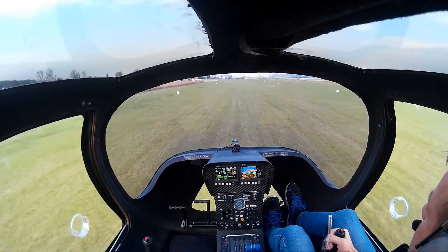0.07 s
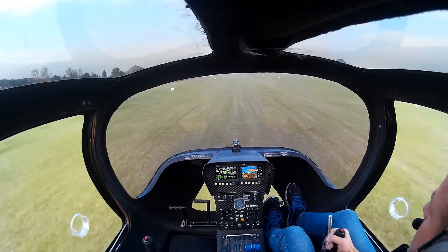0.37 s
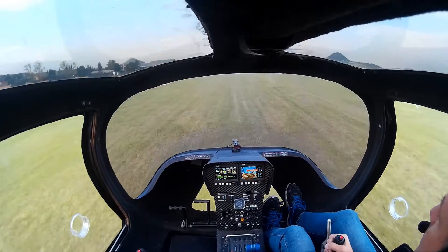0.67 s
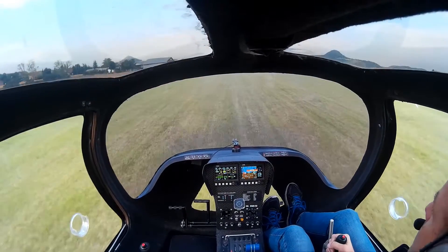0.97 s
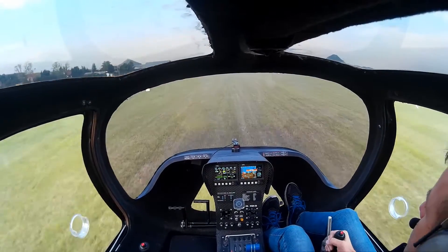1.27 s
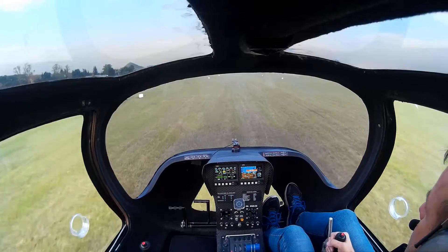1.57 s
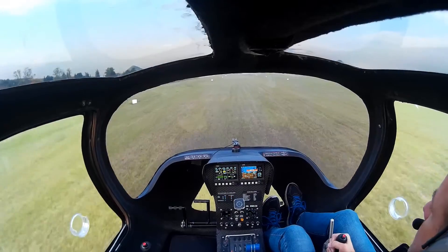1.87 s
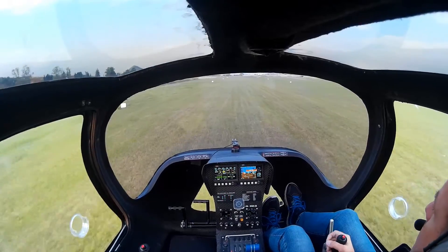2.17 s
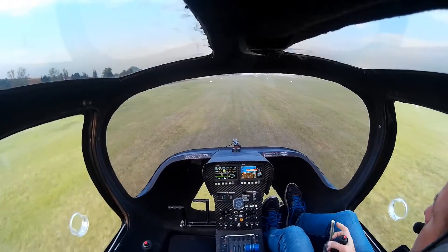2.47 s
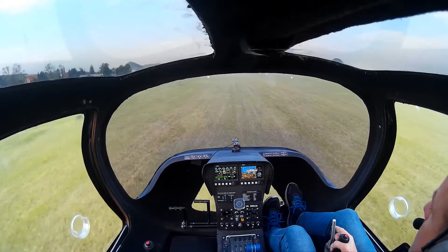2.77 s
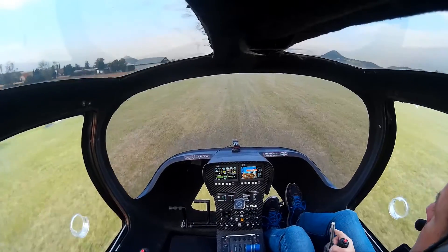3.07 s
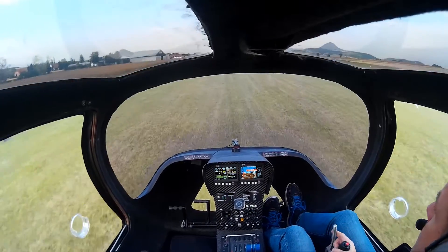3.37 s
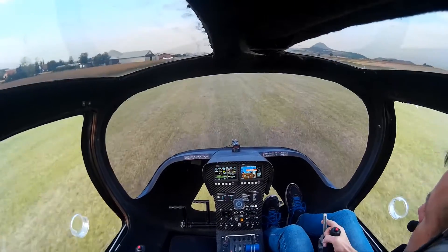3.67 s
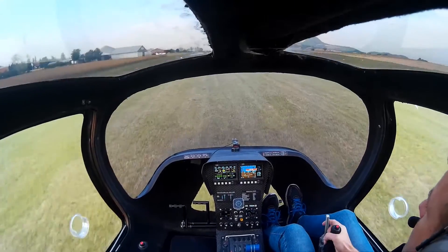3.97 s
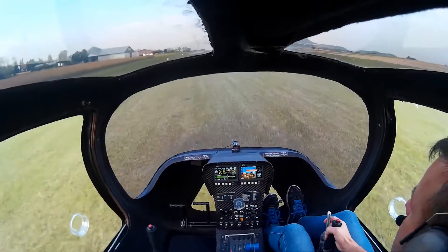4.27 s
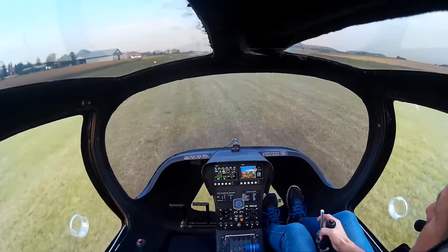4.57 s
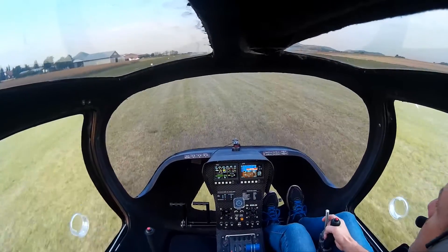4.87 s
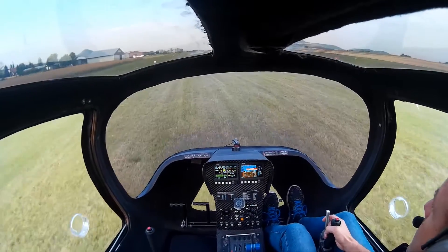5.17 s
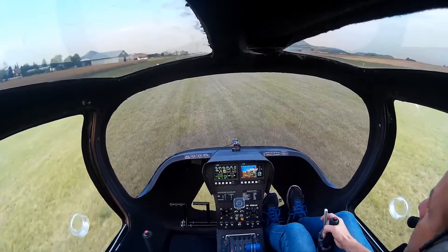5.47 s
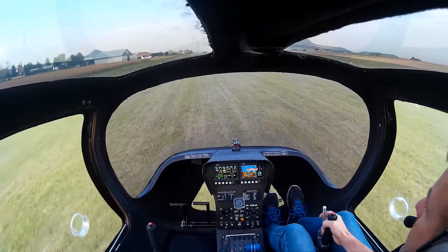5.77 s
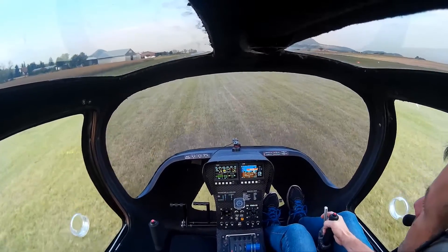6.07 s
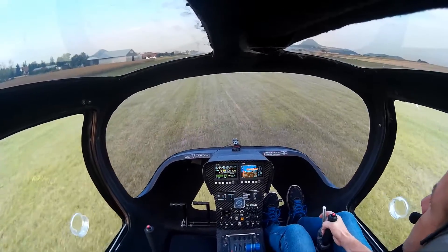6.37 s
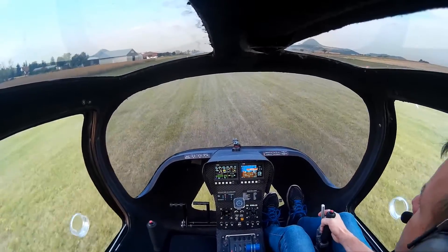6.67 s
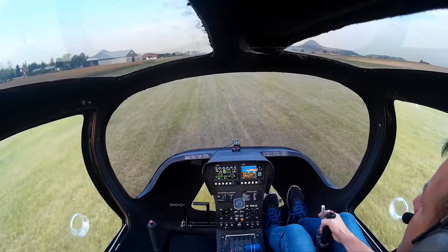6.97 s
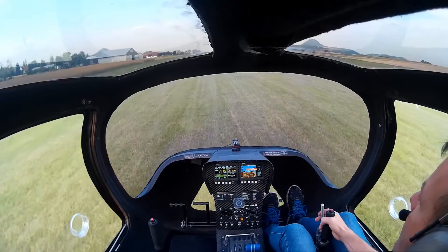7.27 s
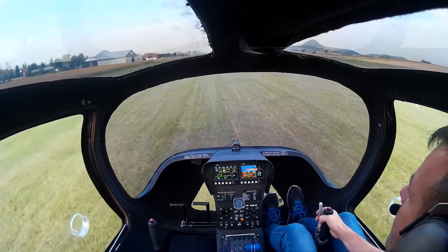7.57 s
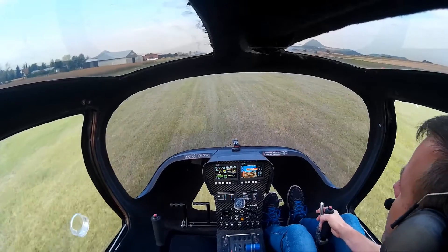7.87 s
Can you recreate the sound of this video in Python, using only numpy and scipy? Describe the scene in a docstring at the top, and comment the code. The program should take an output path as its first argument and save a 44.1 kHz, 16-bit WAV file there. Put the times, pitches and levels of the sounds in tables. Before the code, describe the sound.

A gyroplane taxis over grass, heard from between the seats of its closed cabin, with the piston engine and propeller droning close behind. The engine revs up immediately, then falls back with a ragged burble at about 0.7 seconds. At 1.6 seconds it revs again, holds a louder, higher drone until 3.7, then sinks to a low, lumpy idle that lasts to the end at about 8 seconds.

Underneath, the wheels rumble on turf, with a faint grass swish and light chatter of loose parts. A small knock and metallic clink come at 1.3 seconds, and scattered bumps at 0.8, 2.7 and 3.2. From 3.8 to 5.6 seconds, heavy thumps shake the cabin and fittings clatter, with the sharpest knock at 4.1 and a duller one at 5.1. The rumble then eases, leaving a few light knocks between 6.7 and 7.7 seconds.

```python
"""Closed cabin of a gyroplane taxiing over grass, microphone between the seats. Close behind, the
four-cylinder engine gets two bursts of throttle, then settles to a lumpy idle; its orders beat with
the geared three-blade propeller. Underneath, the wheels rumble and thump on the turf and grass
brushes the tyres. All around, at arm's length, loose fittings knock and chatter."""
import sys
import numpy as np
from scipy import signal
from scipy.fft import rfft, irfft
from scipy.io import wavfile
from scipy.ndimage import uniform_filter1d

SR = 44100
rng = np.random.default_rng(int(sys.argv[2]) if len(sys.argv) > 2 else 0)


def store_wav(level_fs):
    """Save 16-bit WAV to argv[1]."""
    pcm = np.round(np.clip(np.atleast_2d(level_fs), -1, 1) * 32767)
    wavfile.write(sys.argv[1], SR, pcm.T.astype(np.int16))


N = 358091
TIME = np.arange(N) / SR

# grass brushing the wheels as the roll slows: t/s, level/dB
GRASS_LEVEL = [(0, -61.5), (1.5, -63.5), (3, -70), (4.3, -64), (5, -72), (6.5, -77.5), (8.12, -78.5)]
# wheel rumble, set by rolling speed and the state of the turf: t/s, level/dB
RUMBLE_LEVEL = [(0, -23.5), (1, -21.5), (1.55, -25), (2.1, -20.5), (3.3, -24.5), (4.2, -21.5), (5.3, -26),
                (6.6, -32.5), (8.12, -31.5)]
# spectra of grass, loose parts, knocks, turf rumble and shuddering shell: f/Hz, relative level/dB
GRASS_SPECTRUM = [(1000, -22.5), (2100, 16.5), (2700, 5), (3500, -0.5), (4250, 3), (4900, -18), (5500, -11),
                  (6300, -27.5), (12000, -38.5)]
CLATTER_SPECTRUM = [(500, -14), (900, 0), (1500, -1), (2100, -7), (2800, -17), (3300, -17), (4200, -27),
                    (6000, -40), (12000, -50)]
KNOCK_SPECTRUM = [(150, -16), (400, 16), (850, 12), (1300, 0), (2200, -10.5), (2800, -18), (3400, -15),
                  (4200, -17), (6000, -32), (9000, -40), (15000, -41)]
TURF_SPECTRUM = [(8, -23), (20, -5.5), (35, 0), (75, 4), (115, 6), (150, -2.5), (260, -1.5), (450, -30.5),
                 (1000, -80.5)]
SHELL_SPECTRUM = [(100, -11.5), (180, -0.5), (400, 3.5), (600, -5), (1000, -16.5), (1600, -27),
                  (2600, -48.5), (6000, -73.5)]
# resonances of the thin metal trim: f/Hz, width/Hz, level/dB
TRIM_MODES = [(3290, 150, -4), (3620, 160, -8), (4250, 130, -1), (5490, 48, -11)]
# fittings knocking: t/s, peak/dB, treble tilt/(dB per octave), t60/s, trim ring/dB
KNOCKS = [(1.264, -29, -1, 0.11, -9), (1.345, -37, 1, .08, -9), (1.714, -31, -1, .08, -12),
          (1.895, -33, 0, .05, -12), (2.262, -28, -.5, .05, -12), (4.113, -12.5, -.7, 0.045, -14),
          (4.132, -21, -2.6, 0.17, -9), (4.238, -45, 3.5, .02, -9), (4.272, -33, -1, 0.03, -9),
          (4.357, -27, -2, .06, -9), (4.394, -38, 2.5, .015, -9), (4.411, -22, -3.2, 0.08, -9),
          (4.607, -31, -1.5, .03, -7), (4.715, -21.5, -1, .045, -16), (5.124, -15, -9.5, .1, -12),
          (5.300, -31, -1.5, .05, -9), (5.368, -31, -1, .035, 13), (6.668, -28, -4, .07, -9),
          (6.942, -31, -2, .04, -3), (7.210, -32, -1.5, .04, 4), (7.342, -30, -2, .06, -12),
          (7.700, -24, -3.5, .065, -14)]
# small metal part rung by the first knock: f/Hz, level/dB, t60/s
CLINK_MODES = [(1220, -6, 0.29), (1270, 1.5, 0.096), (2050, -18, 0.12)]
# wheels dropping into ruts: t/s, airframe thump peak/dB, shell shudder peak/dB
RUTS = [(0.824, -20, -19), (2.699, -11, -31), (3.152, -15, -35), (3.774, -4.5, -17), (3.99, -9.5, -19),
        (4.125, -9.5, -14), (4.26, -8.5, -23.5), (4.306, -11, -17.5), (4.375, -6.5, -15.5),
        (4.606, -17, -24.5), (4.68, -13, -14), (4.835, -14, -24), (5.251, -7.5, -21), (5.41, -14, -20),
        (5.601, -12, -30), (6.3, -18, -30)]
# low modes of the airframe: f/Hz, level/dB, t60/s
AIRFRAME_MODES = [(52.4, -3, 0.15), (82.7, 3.5, 0.11), (139, 1, 0.1), (170, -0.5, 0.077),
                  (278.8, -0.5, 0.098)]

# bursts of throttle: opens/s, closes/s, crank speed gained/Hz
THROTTLE_BURSTS = [(.01, .668, 22.4), (1.612, 3.668, 23.92)]
# crank speed with the throttle shut, sinking a little: t/s, f/Hz
IDLE_SPEED = [(0, 30), (1.6, 30.2), (3.05, 30), (3.65, 29.4), (5, 29.52), (8.12, 29.29)]
# crank speed at the three power settings (idle, half throttle, taxi power): f/Hz
SPEEDS_HZ = [29.38, 47.8, 53.28]
# how drone, blade wash and valve gear grow over those settings: relative level/dB
DRONE_DB = [-28.5, -18.5, -16.5]
WASH_DB = [-43, -37, -33.5]
VALVES_DB = [-73.5, -67.5, -63]
# the four firings of a cycle: relative level/dB
CYLINDERS_DB = [0, -2.2, -.2, -2.4]
# resonances of the airbox, of silencer and cabin, and of the panels: f/Hz, width/Hz, level/dB
AIRBOX_MODES = [(524.5, 24, -2), (613, 26, 0.5), (667, 46, -2.5), (720, 38, -0.5)]
BURBLE_MODES = [(80, 25, -0.5), (169, 30, 0.5), (264, 71, -6), (380, 50, -0.5), (532, 50, -7)]
PANEL_MODES = [(432, 54, -5.5), (503, 72, 3), (620, 38, 2.5), (707, 55, -3), (814, 64, -7),
               (924, 100, -5.5), (1205, 235, -13)]
# spectra of cabin boom, wash leaking in and valve gear: f/Hz, relative level/dB
BOOM_SPECTRUM = [(60, -26.5), (100, -9), (150, -7), (175, 2.5), (205, -5), (235, -5.5), (310, 0.5),
                 (400, 0.5), (455, -1.5), (500, -4.5), (560, -9), (750, -28.5), (1500, -80.5)]
LEAK_SPECTRUM = [(200, -14.5), (400, -4), (560, -9), (700, -4.5), (1000, -11.5), (1250, -18), (1600, -19.5),
                 (1900, -30.5), (2200, -32), (2700, -50), (5000, -76)]
VALVE_SPECTRUM = [(1000, -12.5), (2000, -3), (2700, 1.5), (3400, 0.5), (4100, -1), (4800, -13),
                  (5500, -15.5), (6500, -26.5), (12000, -50)]
# lift that a standing wave across the cabin gives to tones on its pitch: t/s, level/dB
CABIN_LIFT = [(0, 7), (.45, 7.5), (1.1, 12), (1.4, 7), (2.1, 6), (3.6, 8), (4.15, 13), (4.6, 5), (5.8, 8.5),
              (6.7, 9.5), (8.12, 8)]
# propeller tones: multiple of blade rate, level/dB against the drone at each power setting
BLADE_ORDERS = [(1, -9.5, -20.5, -14.5), (2, -10, -21, -24.5), (3, -12, -15, -14), (4, -18, -26, -10),
                (5, -25.5, -23.5, -24.5), (6, -18.5, -31.5, -28), (7, -25, -25.5, -16)]
# whine of reduction and timing gears: multiple of crank speed, level/dB likewise
GEAR_ORDERS = [(21, -28, -33, -29), (42, -57, -61, -55), (63, -66, -59, -62.5), (84, -71, -64, -76),
               (105, -72, -68, -80), (128, -59, -84, -86)]
# engine orders, the halves from unequal cylinders: multiple of crank speed, level/dB likewise
ENGINE_ORDERS = [(.5, -19, -30, -28), (1, -16, -32, -32), (1.5, -19, -24, -18), (2, -30, -5.5, -9.5),
                 (3, -15, -27.5, -24), (4, -14, -21, -8), (5, -19, -17, -10.7), (5.5, -27, -19, -20.5),
                 (6, -17, -4.7, -5), (6.5, -28, -20, -21), (7, -12, -19, -21.5), (8, -22, -11.5, -16),
                 (9, -23, -23, -26), (10, -23, -20, -7.3), (10.5, -29, -26, -30), (11, -18, -24, -19),
                 (11.5, -29, -28, -20.5), (12, -13, -15, -21), (12.5, -32, -29, -26), (13, -16, -29, -28),
                 (13.5, -30, -28, -23.5), (14, -20, -19, -15.5), (17, -32, -31, -27.5)]

BLADES_PER_TURN = 3 * 21 / 51  # three blades, geared down from the crank
CABIN_MODE_HZ, CABIN_WIDTH_HZ = 381, 38


def undb(db):
    """Decibels to gain."""
    return 10 ** (np.asarray(db) / 20)


def unit(x):
    """Scale to rms 1."""
    return x / np.sqrt(np.mean(x ** 2))


def curve(table):
    """A table of (time, value) joined by straight lines."""
    return np.interp(TIME, *np.transpose(table))


def walk(rate_hz):
    """Smooth random wander of rms 1."""
    hold = int(SR / rate_hz)
    steps = np.repeat(rng.standard_normal(N // hold + 2), hold)
    return unit(uniform_filter1d(steps, hold)[:N])


def lag(x, seconds):
    """Follow x with the inertia of a spinning mass."""
    keep = np.exp(-1 / (seconds * SR))
    return signal.lfilter([1 - keep], [1, -keep], x)


def colour(x, spectrum, tilt_db=0):
    """Causal filter through (f/Hz, level/dB) points, tilted per octave above the second point."""
    size = 4096
    octave = np.log2(np.maximum(np.arange(size // 2 + 1) * SR / size, 1))
    hz, db = np.transpose(spectrum)
    gain_db = np.interp(octave, np.log2(hz), db) + tilt_db * np.maximum(octave, np.log2(hz[1]))
    # folding the cepstrum gives minimum phase
    cepstrum = irfft(np.log(undb(gain_db)))
    cepstrum[1:size // 2] *= 2
    cepstrum[size // 2 + 1:] = 0
    return signal.fftconvolve(x, irfft(np.exp(rfft(cepstrum))))[:len(x)]


def resonate(x, hz, width):
    """One resonance, gain 1 at its centre."""
    return signal.lfilter(*signal.iirpeak(hz, hz / width, fs=SR), x)


def band(x, hz, width):
    """A resonance applied twice for steeper skirts, at rms 1."""
    return unit(resonate(resonate(x, hz, width), hz, width))


def burst(t60):
    """A dense ring of thin panels: noise dying away."""
    t = TIME[:SR // 3]
    return rng.standard_normal(len(t)) * undb(-60 * t / t60)


def add(out, sound, start_s, peak_db):
    """Mix a short sound in at a time and peak level."""
    i = int(start_s * SR)
    out[i:i + len(sound)] += (undb(peak_db) * sound / np.abs(sound).max())[:N - i]


def trim(x):
    """The thin metal trim rings along with whatever shakes it."""
    return sum(undb(db) * resonate(x, hz, width) for hz, width, db in TRIM_MODES)


def grass():
    """Below the floor, grass flicks the tyres and fairings in patches; the trim rings along."""
    flicks = rng.standard_normal(N) * undb(1.7 * walk(900) + 1.2 * walk(12))
    swish = unit(colour(flicks, GRASS_SPECTRUM))
    return undb(curve(GRASS_LEVEL)) * (swish + undb(-7) * unit(trim(flicks)))


def clatter(parts=4, contacts_per_s=55, spread_db=5, shake_s=.06):
    """Loose parts around the cabin chatter at random, harder on rough turf and a touch after ruts."""
    shake = sum((TIME > s) * np.exp(-np.abs(TIME - s) / shake_s) for s, *_ in RUTS)
    chatter = 0
    for _ in range(parts):
        contacts = rng.random(N) < contacts_per_s / parts / SR
        sizes = undb(rng.uniform(-spread_db, spread_db, N))
        chatter = chatter + signal.oaconvolve(contacts * sizes, burst(t60=.058))[:N]
    # well under the rumble, and following it only up to a ceiling
    level_db = np.minimum(curve(RUMBLE_LEVEL), -28) - 29 + .5 * np.minimum(shake, 1)
    return undb(level_db) * unit(colour(chatter, CLATTER_SPECTRUM))


def fittings(contact_s=.002):
    """Fittings knock on the shell close by; hard contacts are brighter, and some rattle the trim."""
    out = np.zeros(N)
    t = TIME[:SR // 3]
    seating = 1 - np.exp(-t / contact_s)
    rattle_hz, rattle_width, _ = TRIM_MODES[0]
    for s, peak_db, tilt_db, t60, trim_db in KNOCKS:
        knock = colour(burst(t60) * seating, KNOCK_SPECTRUM, tilt_db)
        rattle = undb(trim_db) * resonate(knock, rattle_hz, 2 * rattle_width)
        add(out, knock + rattle, s, peak_db)
    clink = sum(undb(db - 60 * t / t60) * np.sin(2 * np.pi * hz * t) for hz, db, t60 in CLINK_MODES)
    add(out, clink, KNOCKS[0][0], peak_db=-28)
    return out


def wheels():
    """Turf rumbles up through the undercarriage; ruts ring the airframe and shake the cabin shell."""
    tussocks_db = 1.5 * walk(12)
    rumble = unit(colour(rng.standard_normal(N), TURF_SPECTRUM))
    out = undb(curve(RUMBLE_LEVEL) + tussocks_db) * rumble
    t = TIME[:SR // 3]
    tyre_give = 1 - np.exp(-t / .01)
    for s, thump_db, shudder_db in RUTS:
        detunes = 1 + .026 * rng.standard_normal(len(AIRFRAME_MODES))
        thump = sum(undb(db - 60 * t / t60) * np.sin(2 * np.pi * (hz * detune * t + rng.random()))
                    for (hz, db, t60), detune in zip(AIRFRAME_MODES, detunes))
        add(out, thump * tyre_give, s, thump_db)
        add(out, colour(burst(t60=.6) * tyre_give, SHELL_SPECTRUM), s, shudder_db)
    return out


def throttle(open_s=.317, close_s=.131, spin_lag_s=.22):
    """Lever position (0-1), the crank speed it asks for (Hz) and the speed that follows (Hz)."""
    lever, gained_hz = 0, 0
    for opens, closes, gain_hz in THROTTLE_BURSTS:
        push = np.clip((TIME - opens) / open_s, 0, 1) * np.clip(1 - (TIME - closes) / close_s, 0, 1)
        lever = lever + push
        gained_hz = gained_hz + gain_hz * push
    idle_hz = curve(IDLE_SPEED)
    return lever, idle_hz + gained_hz, idle_hz + lag(gained_hz, spin_lag_s)


def firings(turns, scatter_db, decay, knock_gain):
    """Two firings a turn: each a turbulent puff and a knock that takes its own cylinder's path."""
    count = (2 * turns).astype(int)
    cylinder = count % 4
    size = undb(np.array(CYLINDERS_DB)[cylinder] + scatter_db * rng.standard_normal(N // 100)[count])
    pulses = size * np.diff(count, prepend=0)
    knocks = sum(signal.oaconvolve(pulses * (cylinder == c), burst(t60=.061))[:N] for c in range(4))
    # decay counts in firing intervals
    puffs = size * np.exp(-(2 * turns % 1) / decay) * rng.standard_normal(N)
    return unit(knock_gain * unit(knocks) + unit(puffs))


def turbo(lever, load, top_hz=7300):
    """A faint, unsteady turbo-like whistle spools up and dies when the lever shuts."""
    spool = lag(load, seconds=.15)
    hz = top_hz * (1 + spool) / 2 * (1 + .012 * walk(300))
    return undb(-84 + 2 * walk(10)) * lever * spool * np.sin(2 * np.pi * np.cumsum(hz) / SR)


def valve_gear(turns):
    """Small impacts of unequal size make a gritty hiss."""
    grit = undb(.64 * walk(400))
    return unit(colour(grit * firings(turns, scatter_db=1.3, decay=4, knock_gain=.2), VALVE_SPECTRUM))


def intake(lever, load):
    """Air rushes past the open throttle plate and rings the airbox until the crank catches up."""
    opening = np.clip((lever - .24) / .16, 0, 1)
    rush = opening * np.sqrt(np.clip(lever - load, 0, 1))
    airbox = sum(undb(db) * band(rng.standard_normal(N), hz, width) for hz, width, db in AIRBOX_MODES)
    return undb(-26.5) * rush * unit(airbox)


def burble(turns, overrun):
    """Throttle shut, the spinning engine fires raggedly into the silencer and cabin resonances."""
    ragged = firings(turns, scatter_db=2, decay=.6, knock_gain=.4)
    rings = sum(undb(db) * band(ragged, hz, width) for hz, width, db in BURBLE_MODES)
    return undb(-19) * np.sqrt(overrun) * unit(rings)


def blade_wash(turns):
    """Engine noise, lightly chopped by the blades, gets in by a broad leak and resonant panels."""
    chop = 1 + .023 * np.cos(2 * np.pi * BLADES_PER_TURN * turns)
    outside = chop * firings(turns, scatter_db=1.2, decay=7.4, knock_gain=.52)
    f = np.geomspace(100, SR / 2, 400)
    leak_hz, leak_db = np.transpose(LEAK_SPECTRUM)
    power = undb(np.interp(np.log(f), np.log(leak_hz), leak_db)) ** 2
    for hz, width, db in PANEL_MODES:
        power = power + undb(db) ** 2 / (1 + 2 * ((f - hz) / width) ** 2) ** 2
    return unit(colour(outside, np.column_stack([f, 10 * np.log10(power)])))


def cabin_boom(turns):
    """The firings boom in the closed cabin."""
    return unit(colour(firings(turns, scatter_db=0, decay=2, knock_gain=.37), BOOM_SPECTRUM))


def shaft_tones(turns, hz, lever, orders, waver_db, slip_rad, ratio=1):
    """Shaft harmonics waver with uneven combustion; the cabin lifts those on its standing wave."""
    lift_db = curve(CABIN_LIFT)
    # an open lever pulls towards the half-throttle balance before the crank has sped up
    balance_hz = hz + .6 * lever * np.maximum(SPEEDS_HZ[1] - hz, 0)
    out = 0
    for order, *levels in orders:
        multiple = order * ratio
        on_mode = np.exp(-2 * ((multiple * hz - CABIN_MODE_HZ) / CABIN_WIDTH_HZ) ** 2)
        db = np.interp(balance_hz, SPEEDS_HZ, levels) + lift_db * on_mode + waver_db * walk(14)
        # the airframe spreads the orders in phase, so they drone instead of clicking
        cycles = multiple * turns + .38 * multiple ** 2
        out = out + undb(db) * np.sin(2 * np.pi * cycles + slip_rad * walk(22))
    return out


def engine():
    """Just behind the seats: crank, gear and propeller tones over the noise of gas, air and valves."""
    lever, asked_hz, hz = throttle()
    # loudness follows the load, so it runs a little ahead of the speed
    effort_hz = hz + .25 * (asked_hz - hz)
    drone_db = np.interp(effort_hz, SPEEDS_HZ, DRONE_DB)
    wash_db = np.interp(effort_hz, SPEEDS_HZ, WASH_DB) + 8
    valves_db = np.interp(effort_hz, SPEEDS_HZ, VALVES_DB)
    load = np.interp(hz, SPEEDS_HZ[::2], [0, 1])  # 0 at idle, 1 at taxi power
    # with the lever shut and the crank still fast, the firings go weak
    overrun = np.clip(3 * (load - lever), 0, 1) * load ** 1.7
    tones_db = drone_db + 4 - 10 * overrun
    boom_db = drone_db - 2.5 - 6.5 * np.sqrt(load) * (1 - overrun / 2)
    # the flywheel runs less evenly at idle
    wobble = (.00085 + .00097 * (1 - load)) * walk(25)
    turns = np.cumsum(hz * (1 + wobble)) / SR
    crank = shaft_tones(turns, hz, lever, ENGINE_ORDERS, waver_db=2.1, slip_rad=.28)
    gears = shaft_tones(turns, hz, lever, GEAR_ORDERS, waver_db=2.2, slip_rad=.72)
    gears = gears + undb(7) * trim(gears)  # the whine swells as it crosses the trim's resonances
    blades = shaft_tones(turns, hz, lever, BLADE_ORDERS, waver_db=1.5, slip_rad=.063,
                         ratio=BLADES_PER_TURN)
    return (undb(tones_db) * (crank + gears + blades)
            + undb(boom_db) * cabin_boom(turns)
            + undb(wash_db) * blade_wash(turns)
            + undb(valves_db) * valve_gear(turns)
            + intake(lever, load) + burble(turns, overrun) + turbo(lever, load))


def scene():
    """Everything heard between the seats, in mono."""
    return (engine() + wheels() + grass() + fittings() + clatter())[None]


def record(dry):
    """The camera's microphone adds faint hiss and cuts the top."""
    hiss = undb(-69.7) * rng.standard_normal(dry.shape)
    top_hz = 15300
    return signal.sosfilt(signal.ellip(8, .2, 70, top_hz, fs=SR, output="sos"), dry + hiss)


dry = scene()
out = record(dry)
store_wav(out)
```